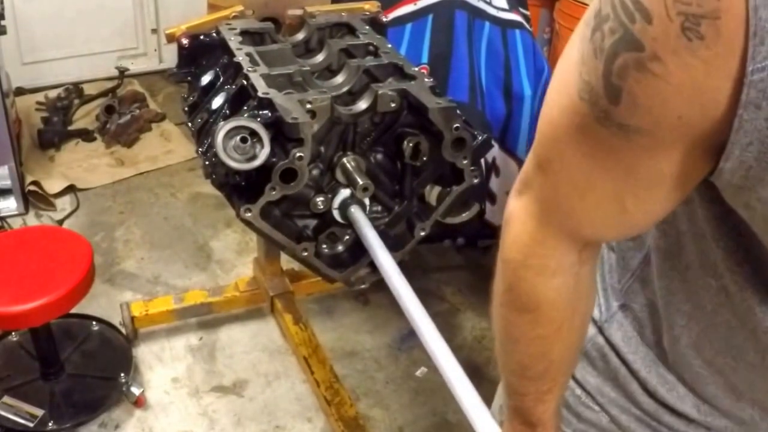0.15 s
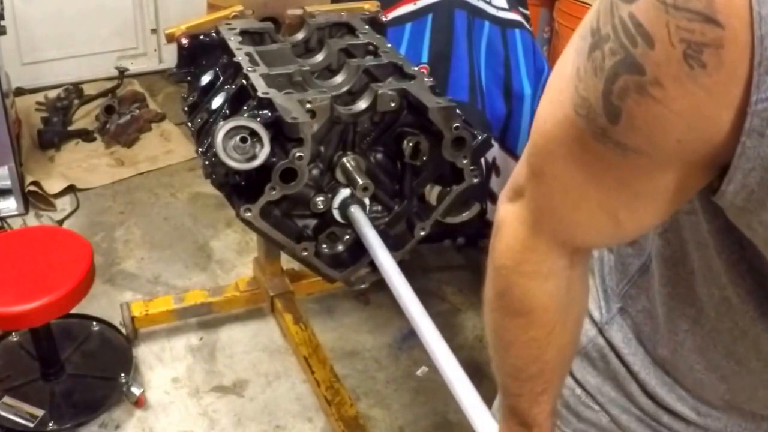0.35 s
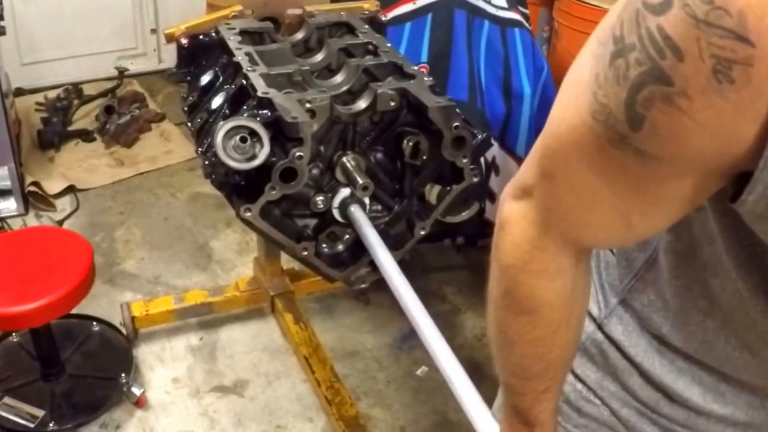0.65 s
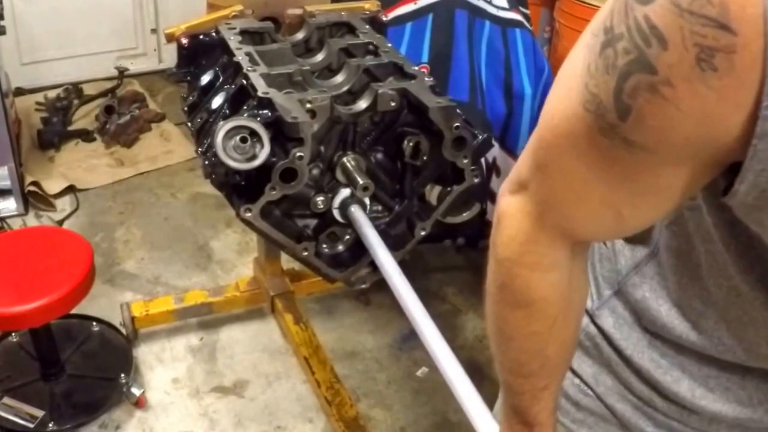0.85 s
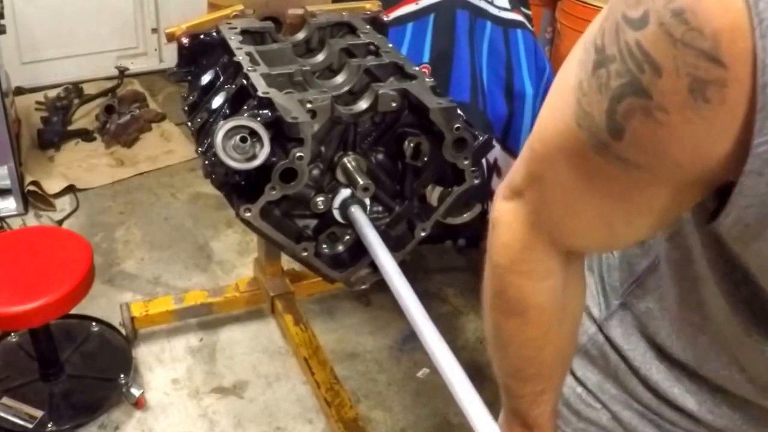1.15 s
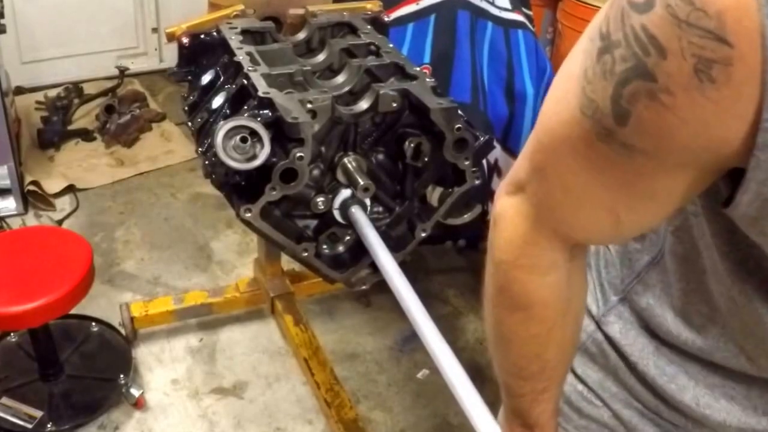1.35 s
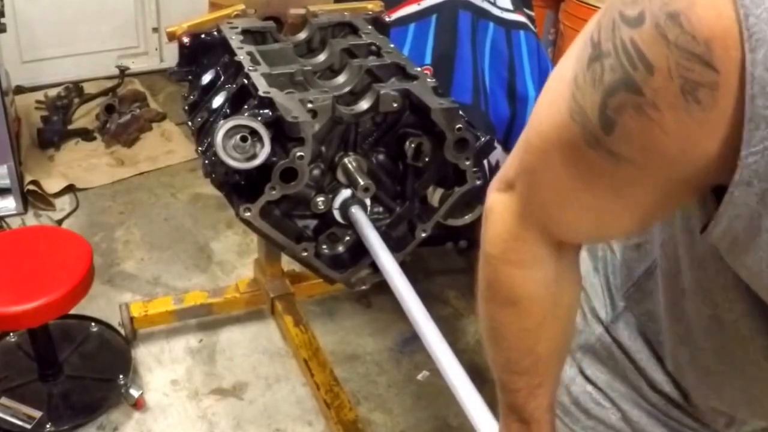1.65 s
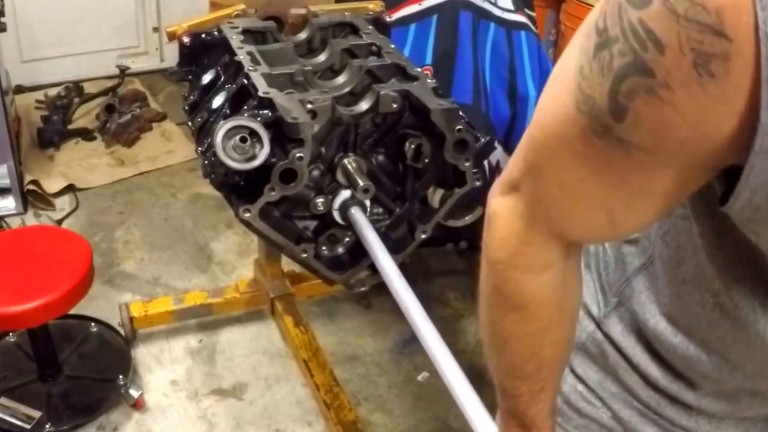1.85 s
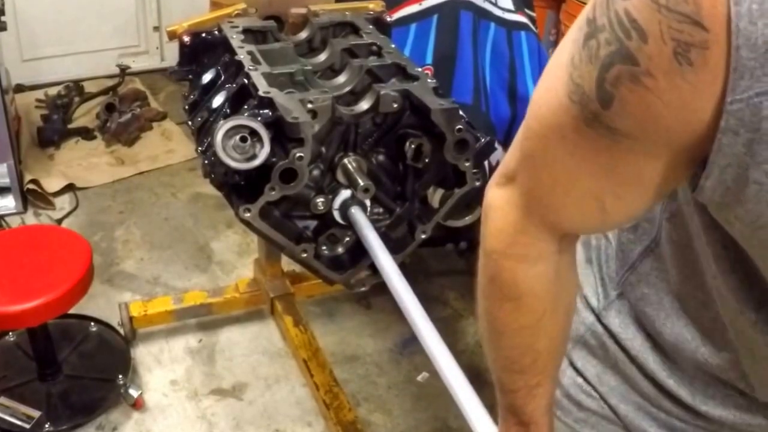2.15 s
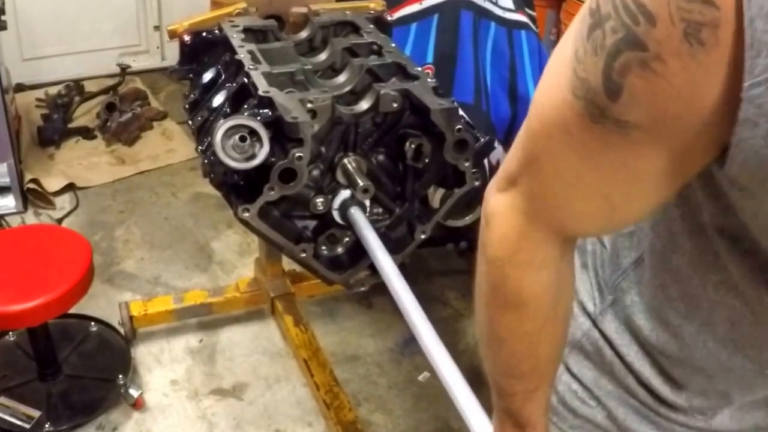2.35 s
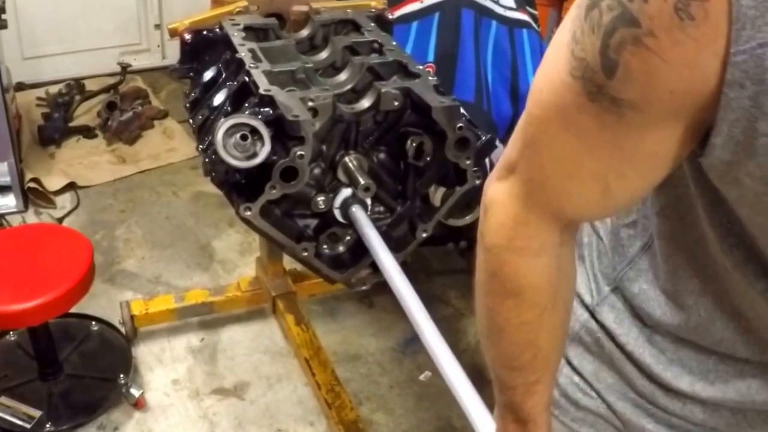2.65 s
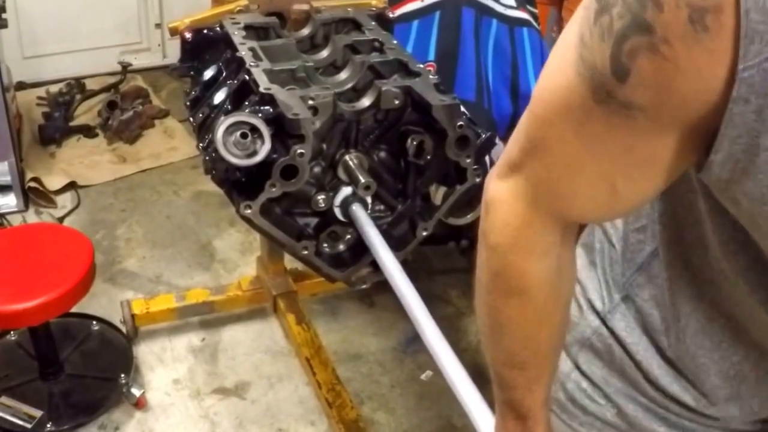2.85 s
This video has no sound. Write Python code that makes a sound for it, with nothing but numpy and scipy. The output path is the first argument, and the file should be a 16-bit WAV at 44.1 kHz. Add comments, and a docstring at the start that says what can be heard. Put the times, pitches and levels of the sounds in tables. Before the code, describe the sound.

Steel hammer blows on a metal rod ring through a garage. After a light, dry tap come four loud strikes, slightly distorting the microphone as the engine block clanks. Faint cloth swishes precede each, over a low room rumble.

```python
"""A hammer drives a bearing into an engine block through a long metal rod, in a garage.
One light tap seats the rod. Four hard blows follow: steel cracks on steel, the block clanks and the rod
rings in decaying modes, the garage reverberates, and the peaks overload the microphone.
Cloth swishes faintly on each backswing, over a low room rumble; both are shaped noise."""
import sys
import numpy as np
from scipy import signal
from scipy.fft import rfft, irfft
from scipy.io import wavfile

SR = 44100
rng = np.random.default_rng(int(sys.argv[2]) if len(sys.argv) > 2 else 0)


def persist_wave(psi):
    """Save psi, clipped to +-1, as 16-bit WAV."""
    counts = np.round(np.clip(psi, -1, 1) * 32767).astype(np.int16)
    wavfile.write(sys.argv[1], SR, np.atleast_2d(counts).T)


N = 132300
AGE_S = np.arange(SR) / SR  # time since an impact
BLOCK_RISE_S, CRACK_T60_S = 0.0013, 0.015

# decay of the garage and of the small high modes (frequency [Hz], t60 [s])
DECAY_TIMES = [(60, 0.82), (300, 0.32), (700, 0.43), (1300, 0.41), (2500, 0.39), (5000, 0.42), (9000, 0.35),
               (15000, 0.28)]
# steel-on-steel contact (frequency [Hz], relative density [dB])
CRACK_SPECTRUM = [(500, 6), (2500, -32), (5500, -3), (9500, -4), (15000, -12.5)]


def amp(db):
    """Decibels to gain."""
    return 10 ** (np.asarray(db) / 20)


def lookup(points, hz):
    """Table value, interpolated over log frequency."""
    points_hz, values = np.transpose(points)
    return np.interp(np.log(hz + 1), np.log(points_hz + 1), values)


def add(mix, start_s, sound):
    """Mixes a sound in at start_s."""
    part = mix[round(start_s * SR):][:len(sound)]
    part += sound[:len(part)]


def colour(x, spectrum):
    """Filters x by a spectrum; rms 1."""
    hz = np.fft.rfftfreq(len(x), 1 / SR)
    shaped = irfft(rfft(x) * amp(lookup(spectrum, hz)), len(x))
    return shaped / np.std(shaped)


def rise(tau_s):
    """Attack envelope."""
    return 1 - np.exp(-AGE_S / tau_s)


def fade(t60_s):
    """Decay envelope."""
    return amp(-60 * AGE_S / t60_s)


def wander(size, width_cycles):
    """Smooth complex noise, rms 1; bandwidth in cycles per array."""
    lowpass = np.exp(-(np.fft.fftfreq(size, 1 / size) / width_cycles) ** 2)
    smooth = np.fft.ifft(np.fft.fft(rng.standard_normal(size)) * lowpass)
    smooth = smooth + 1j * np.roll(smooth, size // 2)
    return smooth / np.std(smooth)


def ring(modes, scatter_db=0, tilt_db_per_oct=0, flutter=0, flutter_hz=14):
    """Decaying sines of alternating sign; reflections make them flutter."""
    out = np.zeros(SR)
    for k, (hz, db, t60_s) in enumerate(modes):
        octaves = np.log2(hz / modes[0][0])
        gain = amp(db + scatter_db * rng.standard_normal() + tilt_db_per_oct * octaves)
        waver = (1 + flutter * wander(SR, flutter_hz)) / np.hypot(1, flutter) if flutter else 1
        tone = (waver * np.exp(2j * np.pi * hz * AGE_S)).imag
        out += (-1) ** k * gain * fade(t60_s) * tone
    return out


def diffuse():
    """1 s of evenly spread reflections: noise with a levelled short-time spectrum."""
    noise = rng.standard_normal(SR)
    for _ in range(3):
        bins = signal.stft(noise, nperseg=1024)[2]
        noise = signal.istft(bins / (abs(bins) + 1e-12), nperseg=1024)[1][:SR]
    return noise / np.std(noise)


def rumble(drone_hz=56, drone_width_hz=6.5):
    """Steady rumble and air of the garage, with a wavering narrow-band drone."""
    # room noise (frequency [Hz], relative density [dB])
    air_spectrum = [(12, -15.5), (25, -4), (45, -1), (70, -8.5), (100, -14), (150, -17.5), (220, -25.5),
                    (330, -21.5), (500, -25.5), (750, -21.5), (1000, -24), (1350, -27), (1900, -38),
                    (3600, -42), (8000, -50), (15000, -56.5)]
    hz = np.fft.rfftfreq(N, 1 / SR)
    band = np.exp(-((hz - drone_hz) / drone_width_hz) ** 2)
    drone = irfft(rfft(rng.standard_normal(N)) * band, N)
    return amp(-46.5) * colour(rng.standard_normal(N), air_spectrum) + amp(-47) * drone / np.std(drone)


def tap(start_s=0.3847, rebound_s=0.0024):
    """Light tap: a dry click and its rebound, too weak to ring the rod."""
    # click and its reflections (frequency [Hz], relative density [dB])
    tap_spectrum = [(60, -2), (140, 0.5), (230, 2.5), (370, 4.5), (800, -1.5), (1400, -3.5), (2200, -8),
                    (3300, -11.5), (4100, -25), (5300, -17), (7000, -23), (10000, -27.5), (15000, -38)]
    envelope = amp(-27.5) * fade(t60_s=0.0046) + amp(-31) * fade(t60_s=0.2)
    click = colour(diffuse(), tap_spectrum) * envelope
    room = amp(-34.5) * garage(colour(diffuse(), tap_spectrum))
    rebound = amp(-53) * colour(diffuse(), CRACK_SPECTRUM) * fade(CRACK_T60_S)
    out = np.zeros(N)
    add(out, start_s, click + amp(-42) * block() + room)
    add(out, start_s + rebound_s, rebound)
    return out


def block():
    """Hollow clank of the engine block's modes."""
    # (frequency [Hz], level before tilt [dB], t60 [s])
    block_modes = [(332, -6.2, 0.26), (363, -5.9, 0.26), (384, -5.6, 0.26), (424, -8.1, 0.26),
                   (502, -8.0, 0.26), (559, -3.4, 0.26), (584, -1.6, 0.26), (744, -0.7, 0.26),
                   (774, -2.0, 0.26), (867, -3.9, 0.26), (890, -2.8, 0.26), (921, -3.1, 0.26),
                   (989, -5.9, 0.26), (1042, -5.3, 0.26), (1081, -3.5, 0.26), (1137, -5.5, 0.26),
                   (1231, -2.2, 0.26)]
    return ring(block_modes, tilt_db_per_oct=-3.1) * rise(BLOCK_RISE_S)


def garage(reflections):
    """Reverberation: reflections build up, then die band by band."""
    hz, time_s, bins = signal.stft(reflections, SR, nperseg=512, noverlap=384)
    bins = bins * amp(-60 * time_s / lookup(DECAY_TIMES, hz)[:, None])
    return signal.istft(bins, SR, nperseg=512, noverlap=384)[1][:SR] * rise(tau_s=0.0024)


def cloth():
    """Soft swish as the arm draws back."""
    # backswings (centre [s], Gaussian sigma [s], level [dB])
    swings = [(0.842, 0.052, -56), (1.455, 0.068, -58.5), (2.078, 0.062, -58.5), (2.675, 0.064, -61)]
    # swish (frequency [Hz], relative density [dB])
    cloth_spectrum = [(300, -21.5), (1500, -1.5), (2500, 6), (3800, -1), (5400, 6.5), (7800, -10.5),
                      (10300, -5), (15000, -26)]
    time_s = np.arange(N) / SR
    envelope = sum(amp(db) * np.exp(-((time_s - centre_s) / sigma_s) ** 2 / 2)
                   for centre_s, sigma_s, db in swings)
    return envelope * colour(rng.standard_normal(N), cloth_spectrum)


def knock():
    """Blunt first push of a blow."""
    # (frequency [Hz], relative level [dB], t60 [s])
    knock_modes = [(960, 4.5, .011), (640, -6, 0.02), (1204, 0, 0.01)]
    return ring(knock_modes) * rise(tau_s=0.00046)


def crack():
    """Steel meets steel and chatters for a few milliseconds."""
    # (delay [s], relative level [dB])
    contacts = [(0, -2), (.0042, -1), (.0075, 8.5)]
    out = np.zeros(SR)
    for delay_s, db in contacts:
        burst = colour(rng.standard_normal(SR), CRACK_SPECTRUM) * fade(CRACK_T60_S)
        add(out, delay_s, amp(db - 16) * burst)
    return out


def thud():
    """Low shudder of block and stand."""
    # (frequency [Hz], relative level [dB], t60 [s])
    thud_modes = [(55, -45, .18), (122, -34, 0.3), (150.3, -35, .2), (191.5, -39, 0.33)]
    return ring(thud_modes) * rise(BLOCK_RISE_S)


def ripple(depth_db=3.2, width_hz=70, from_hz=1600):
    """Gain per frequency: treble peaks and dips from crowded metal modes."""
    hz = np.fft.rfftfreq(SR, 1 / SR)
    bumps = wander(len(hz), hz[-1] / width_hz / 2).real
    gain = amp(depth_db * np.clip(bumps / np.std(bumps), -2, 2))
    return np.where(hz > from_hz, gain / np.sqrt(np.mean(gain ** 2)), 1)


def vary(response, peaks):
    """Renews part of a response, most in the treble, and applies the metal's peaks."""
    # share common to all blows (frequency [Hz], correlation [0-1])
    likeness = [(100, .7), (1200, .85), (2500, .65), (6000, .5), (15000, .3)]
    common = lookup(likeness, np.fft.rfftfreq(SR, 1 / SR))
    fresh = np.sqrt(1 - common ** 2) * rfft(rng.standard_normal(SR))
    return irfft(peaks * (common * rfft(response) + fresh), SR)


def clang(response):
    """Dense metal modes as fast-decaying noise."""
    # (frequency [Hz], relative density [dB])
    clang_spectrum = [(50, -32), (100, -26), (250, -12.5), (400, -9.5), (520, -15), (650, -10), (900, 3.5),
                      (1700, -10.5), (2400, -9), (4500, -16), (6500, -21.5), (9500, -32), (15000, -40.5)]
    return amp(-12) * colour(response, clang_spectrum) * fade(t60_s=0.14)


def shimmer(modes_hz, lowest_hz, tilt_db_per_oct=-7.5, spread_db=5):
    """Small high modes of the metal, struck with a different strength each time."""
    scatter_db = spread_db * np.tanh(rng.standard_normal(len(modes_hz)))
    phases = rng.random(len(modes_hz))
    levels_db = -40.5 + tilt_db_per_oct * np.log2(modes_hz / lowest_hz) + scatter_db
    return sum(amp(db) * fade(lookup(DECAY_TIMES, hz)) * np.sin(2 * np.pi * (hz * AGE_S + phase))
               for hz, db, phase in zip(modes_hz, levels_db, phases))


def rod(tilt_db_per_oct):
    """Ringing modes of the rod; one tone swells late and lingers faintly."""
    # (frequency [Hz], level before tilt [dB], t60 [s])
    rod_modes = [(1336, -6.9, 0.4), (1369, -8.5, 0.4), (1427, -1.1, 0.48), (1514, -10.3, 0.4),
                 (1581, -10.8, 0.48), (1653, -13.6, 0.4), (1791, -13.7, 0.48), (2017, -13.7, 0.4),
                 (2299, -10.0, 0.4), (2435, -11.7, 0.4), (2527, -14.6, 0.4), (3081, -12.9, 0.4),
                 (3132, -16.0, 0.4), (3437, -17.9, 0.4), (3756, -16.1, 0.4), (3832, -15.8, 0.4),
                 (4165, -20.1, 0.4), (5620, -20.3, 0.4)]
    late_hz, late_delay_s, late_rise_s, late_t60_s = 1261, 0.105, 0.012, 0.36
    since_s = np.maximum(AGE_S - late_delay_s, 0)
    swell = (1 - np.exp(-since_s / late_rise_s)) * amp(-20.5 - 60 * since_s / late_t60_s)
    linger = amp(-52.5) * fade(t60_s=2.8)
    late_tone = (swell + linger) * np.sin(2 * np.pi * late_hz * AGE_S)
    ringing = ring(rod_modes, scatter_db=1.5, tilt_db_per_oct=tilt_db_per_oct, flutter=0.45)
    return amp(-14) * ringing * rise(tau_s=0.0045) + late_tone


def blows(shimmer_low_hz=2670, shimmer_high_hz=13850, treble_hz=2500):
    """Each hard blow excites the same block, rod and room."""
    # (time [s], gain [dB], treble shelf [dB], rod gain [dB], crack gain [dB], rod tilt [dB/oct])
    strikes = [(1.0446, 3, -1.5, -4.5, -13, 0), (1.6395, 2.5, -3, -3, -5, -2.5),
               (2.2468, 2, -2, -6, -13, 1), (2.862, 3, -7.5, -6, -15.5, 0)]
    # garage's response to a blow (frequency [Hz], relative density [dB])
    room_spectrum = [(30, -23.5), (55, -10), (95, -14), (130, -18.5), (250, -10), (380, -11.5), (520, -5),
                     (700, -9), (1000, -7), (1350, -1.5), (1700, -17), (2000, -11.5), (2350, -2),
                     (2700, -13.5), (3500, -11.5), (4700, -16), (5500, -13), (6500, -22), (9500, -26),
                     (12000, -33), (15000, -38.5)]
    metal_response, room_response, peaks = diffuse(), diffuse(), ripple()
    shimmer_hz = shimmer_low_hz * (shimmer_high_hz / shimmer_low_hz) ** rng.random(size=40)
    body = knock() + amp(-17.5) * block() + thud()
    highpass = signal.butter(1, treble_hz, "high", fs=SR)
    out = np.zeros(N)
    for start_s, db, treble_db, rod_db, crack_db, tilt_db_per_oct in strikes:
        metal = clang(vary(metal_response, peaks))
        room = amp(-15.5) * garage(colour(vary(room_response, peaks), room_spectrum))
        dense = metal + room + shimmer(shimmer_hz, shimmer_low_hz)
        dense += (amp(treble_db) - 1) * signal.lfilter(*highpass, dense)
        blow = body + dense + amp(rod_db) * rod(tilt_db_per_oct) + amp(crack_db) * crack()
        add(out, start_s, amp(db) * blow)
    return out


def scene():
    """All sources at one microphone."""
    return (blows() + tap() + cloth() + rumble())[None]


def record(dry):
    """Microphone overload flattens the peaks; a low-pass follows."""
    ceiling, knee, cutoff_hz = 0.73, 8, 15500
    clipped = dry / (1 + abs(dry / ceiling) ** knee) ** (1 / knee)
    lowpass = signal.firwin(301, cutoff_hz, window=("kaiser", 9), fs=SR)
    return signal.oaconvolve(clipped, lowpass[None], "same")


dry = scene()
out = record(dry)
persist_wave(out)
```